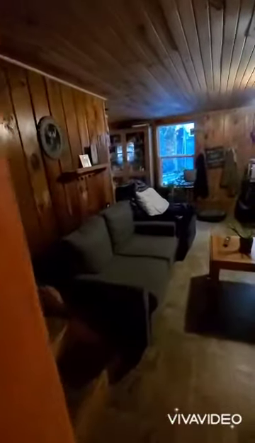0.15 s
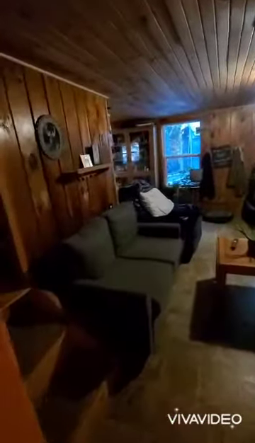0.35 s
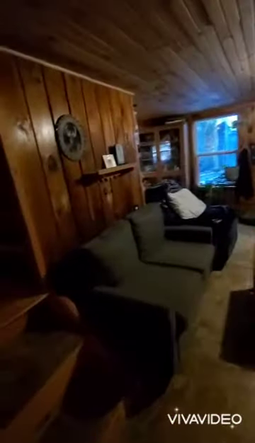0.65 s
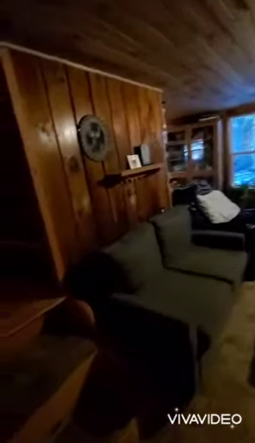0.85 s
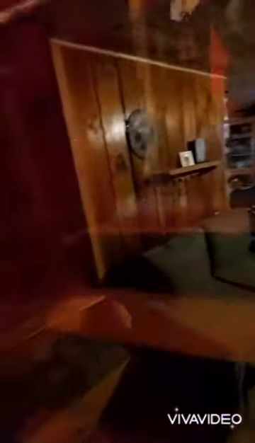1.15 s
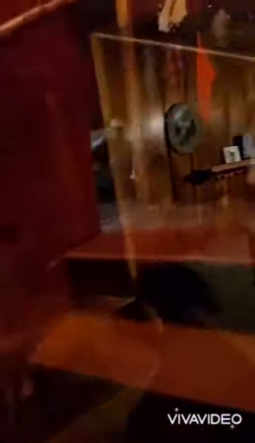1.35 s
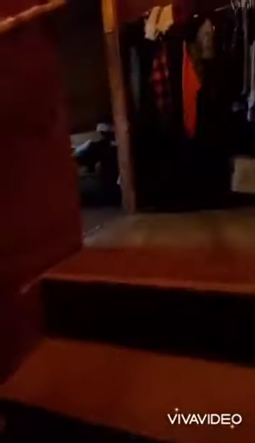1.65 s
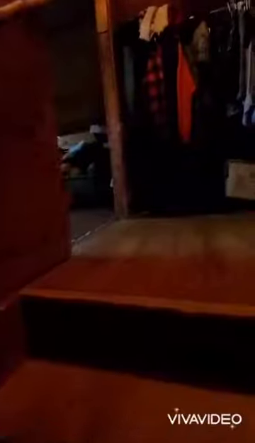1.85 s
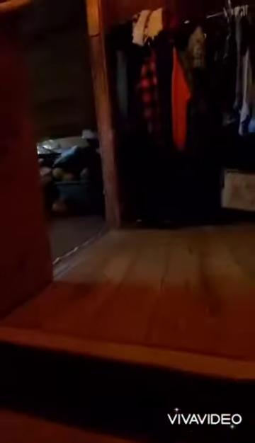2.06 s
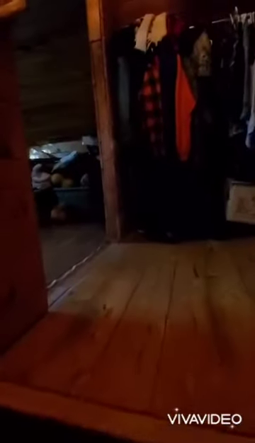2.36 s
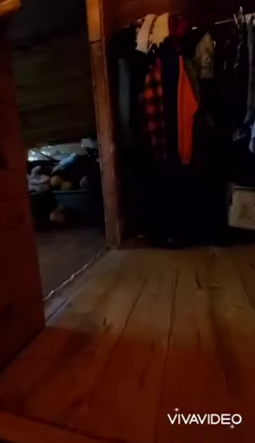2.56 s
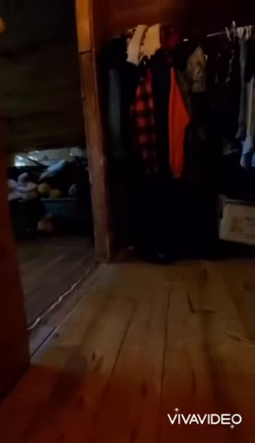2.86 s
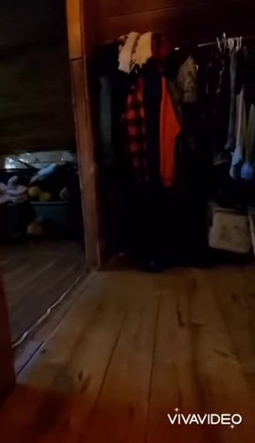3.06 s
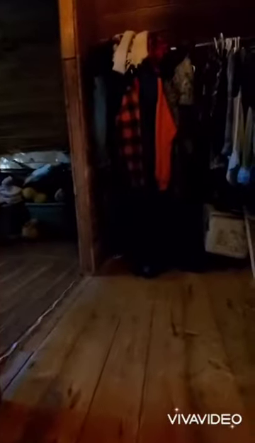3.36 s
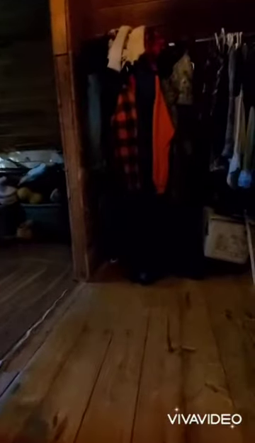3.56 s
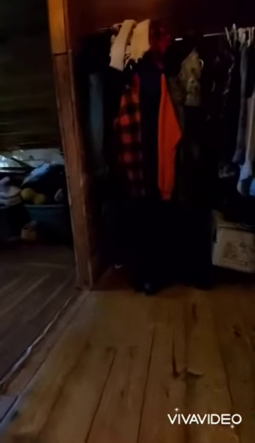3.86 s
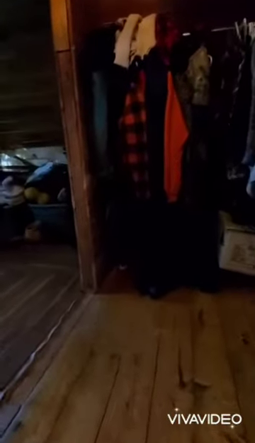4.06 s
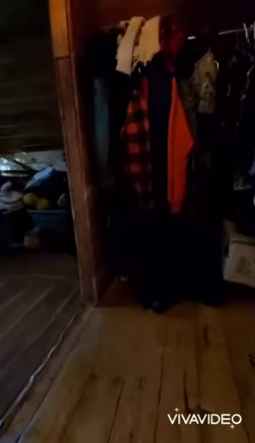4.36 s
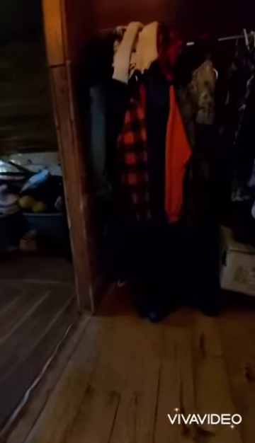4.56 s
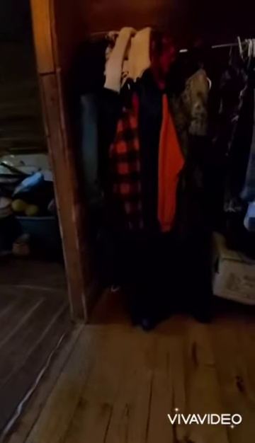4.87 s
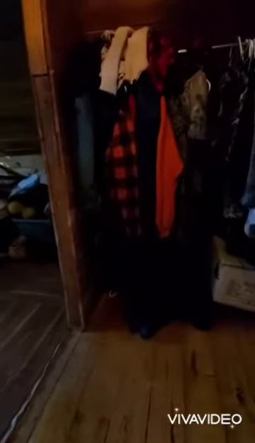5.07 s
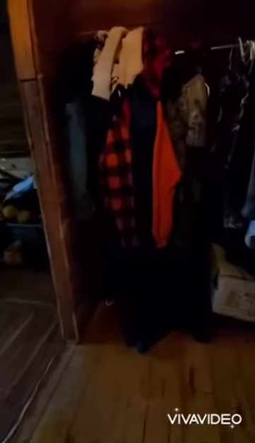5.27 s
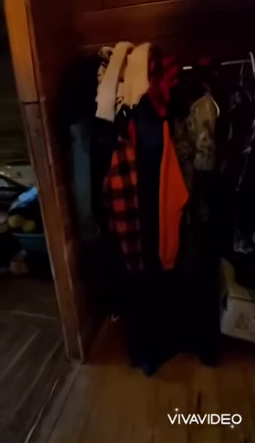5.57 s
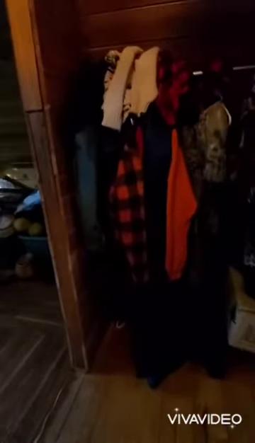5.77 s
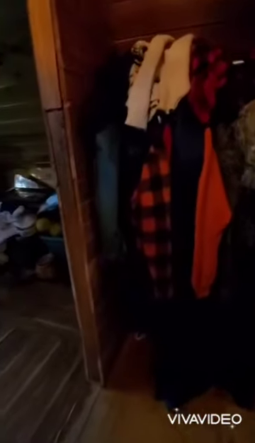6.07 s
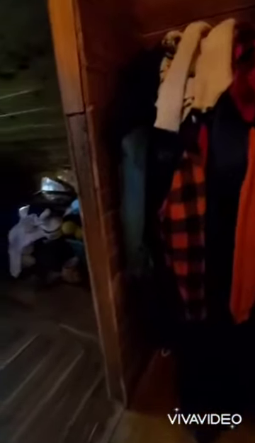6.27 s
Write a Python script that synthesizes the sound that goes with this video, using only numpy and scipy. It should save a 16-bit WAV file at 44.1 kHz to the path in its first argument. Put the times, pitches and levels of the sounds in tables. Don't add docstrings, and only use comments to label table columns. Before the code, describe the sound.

Shoes climb a few wooden stairs and cross a creaking plank landing indoors, uneven knocks and gritty scuffs, as a low fan hum fades behind.

```python
import sys
import numpy as np
from scipy import signal
from scipy.fft import rfft, irfft, next_fast_len
from scipy.io import wavfile
from scipy.ndimage import uniform_filter1d

SR = 44100
rng = np.random.default_rng(int(sys.argv[2]) if len(sys.argv) > 2 else 0)


def master_out(mix):
    frames = np.transpose(np.atleast_2d(mix))
    ceiling = np.clip(frames, -1, 1)
    pcm = np.round(ceiling * 32767).astype(np.int16)
    wavfile.write(sys.argv[1], SR, pcm)


def invert_db(level):
    return 10 ** (np.asarray(level, dtype=float) / 20)


N = 282681
FAST = next_fast_len(N, True)
TIME, HZ = np.arange(N) / SR, np.fft.rfftfreq(FAST, 1 / SR)
RING = TIME[:SR // 3]
THIRDS_HZ = 35 * 2 ** np.arange(0, 8.9, 1 / 3)

# (pitch_hz, side_minus_mid_db)
SIDE_DB = [(60, -18), (110, -20), (200, -10.5), (380, -3), (700, 5.5), (1290, 7), (2380, 0), (4400, 1),
           (8120, -1), (15000, 2)]
# (time_s, level_db)
FAN_LEVEL = [(0.0, -43.5), (0.29, -44.5), (0.82, -45.5), (1.23, -49), (1.36, -51.5), (1.69, -59),
             (2.0, -82)]
# (pitch_hz, level_db per Hz)
ECHO_COLOUR = [(24, -45), (40, -13.5), (194, 2), (276, -4.5), (312, 4.5), (516, 1), (615, 2), (733, -3.5),
               (2840, -21), (3830, -30.5), (5100, -28.5), (8130, -45.5), (9690, -39.5), (14500, -52),
               (16000, -51)]
# (start_s, length_s, knock_db, tap_db, tick_db), tap and tick relative to the knock
SLIDES = [
    (2.152, 0.059, -17.5, 4, -18.5),
    (2.8, 0.13, -22, 2, -24),
    (3.628, 0.2, -18, 0, -17),
    (3.96, 0.32, -68.5, 19, 8),
    (4.548, 0.0317, -26.5, 12.5, -6),
    (5.437, 0.16, -54, -4, -33),
    (5.63, 0.24, -49, -4, -15),
]


def read(table, hz):
    row_hz, value = np.transpose(table)
    return np.interp(np.log(hz + 1), np.log(row_hz + 1), value)


def mid_side(hz):
    return invert_db(np.array([[0], [read(SIDE_DB, hz)]]))


def band(x, lo_hz, hi_hz):
    sos = signal.butter(2, [lo_hz, min(hi_hz, .45 * SR)], "bandpass", fs=SR, output="sos")
    return signal.sosfilt(sos, x)


def walk(rate):
    hold = int(SR / rate)
    levels = np.repeat(rng.standard_normal(N // hold + 1), hold)
    return 1.4 * uniform_filter1d(uniform_filter1d(levels, hold), hold)[:N]


def air(gain, lo_hz, hi_hz):
    mid, side = rfft(rng.standard_normal((2, FAST))) * gain
    inside = (HZ > lo_hz) & (HZ < hi_hz)
    rms = np.sqrt(2 * np.sum(np.abs(mid[inside]) ** 2)) / FAST
    return irfft(np.array([mid, side * invert_db(read(SIDE_DB, HZ))]), FAST)[:, :N] / rms


def drone(lines):
    power = sum(invert_db(2 * db) / width / (1 + (2 * (HZ - hz) / width) ** 2) ** 2 for hz, width, db in lines)
    return air(np.sqrt(power), 0, SR) * np.sqrt(sum(invert_db(2 * db) for hz, width, db in lines))


def fan_level_db():
    return np.interp(TIME, *np.transpose(FAN_LEVEL), left=-150, right=-150)


def fan():
    # (pitch_hz, level_db per Hz)
    rush_colour = [(24, -50), (40, -14), (119, -2.5), (206, -12), (246, -8), (384, -6), (559, -4.5),
                   (730, -11.5), (1220, -10), (2530, -23), (3150, -20.5), (3600, -27), (6700, -37),
                   (7490, -43.5), (8000, -77), (10400, -107), (17600, -120)]
    # (pitch_hz, level_db)
    blade_tones = [(118.4, -55.5), (242.2, -55.5), (317.6, -58), (360.7, -87), (554.5, -51), (646.0, -57),
                   (1179, -58.5), (1394, -58), (2396, -65.5), (3047, -61), (3135, -61), (3245, -58.5),
                   (3456, -70)]
    rush = air(invert_db(read(rush_colour, HZ)), 180, 3000) * invert_db(0.1 * walk(9.7))
    lines = [(hz, 9 + hz / 90, db + 42.5) for hz, db in blade_tones]
    tones = invert_db(0.23 * walk(6.4)) * drone(lines)
    return invert_db(fan_level_db()) * (rush + tones)


def motor():
    # (pitch_hz, level_db)
    motor_tones = [(121, -53), (262, -60), (361, -65), (449, -52), (556, -61), (645, -59), (3133, -62)]
    swell_db, waver_rad = 5, 1.83
    out = np.zeros((2, N))
    for hz, db in motor_tones:
        level = invert_db(db + swell_db * np.tanh(walk(4.5)))
        sides = invert_db(np.array([[3], [read(SIDE_DB, hz)]]))
        phase = 2 * np.pi * (hz * TIME + rng.random((2, 1))) + waver_rad * walk(9.0)
        out += level * sides * np.sin(phase)
    return invert_db(fan_level_db() + 43.0) * out


def house():
    # (pitch_hz, level_db per Hz)
    air_colour = [(15, -36), (25, -12), (41, -14), (75, -2), (130, -20), (150, -16), (247, -17),
                  (285, -16.5), (354, -19.5), (438, -20.5), (835, -26.5), (1250, -39), (1480, -29),
                  (2120, -31), (7500, -40), (9750, -106), (16500, -120)]
    # (pitch_hz, width_hz, level_db)
    house_tones = [(56.7, 7.4, -1), (113.7, 8, -16), (3092, 95, -12.5), (3260, 72, -19), (2860, 250, -17.5),
                   (1234, 360, -7), (2020, 180, -47)]
    # (time_s, level_db)
    hum_level = [(0, -68), (1.33, -66.5), (2.1, -54.5), (3.2, -51.5), (4.29, -66), (4.62, -59), (6.18, -63),
                 (6.41, -58)]
    mains_hz, mains_db, air_db = 60.5, 2.5, -66.5
    core = np.sqrt(2) * invert_db(mains_db + 0.92 * walk(3.8)) * np.sin(2 * np.pi * mains_hz * TIME)
    core = core * np.array([[1], [.1]])
    hum = invert_db(np.interp(TIME, *np.transpose(hum_level))) * (core + invert_db(1.0) * drone(house_tones[:2]))
    whistle_db = air_db + 5.5 + 0.093 * (TIME - 3) + 1.4 * walk(4.4)
    whistle = invert_db(whistle_db) * drone(house_tones[2:])
    still_air = invert_db(air_db + .8 * walk(5.46)) * air(invert_db(read(air_colour, HZ)), 1100, 4200)
    swell = np.interp(TIME, [1.0, 2.0], [.3, 1])
    return swell * (still_air + whistle) + hum


def hiss():
    # (pitch_hz, level_db per Hz)
    hiss_colour = [(3820, -29), (6500, -11), (7820, -95), (8120, -18), (8590, 15), (9190, 16), (10100, 14),
                   (14800, 14.5), (15800, 23.5), (16000, 1)]
    level_db = -76 + np.interp(TIME, [0.9, 1.6], [0.5, 0])
    return invert_db(level_db) * air(invert_db(read(hiss_colour, HZ)) * (HZ > 6500), 7600, 15900)


def footfalls():
    # (start_s, knock_db, weight_db, brightness_db)
    heels = [(1.132, -54, -20, 14), (1.215, -41, 0, 11.5), (1.31, -35, -4, -5), (1.337, -25.5, -12, 5),
             (1.384, -58, 6, -6), (2.227, -23, -2, 8.5), (2.427, -50, 17.5, -11), (2.503, -49, 4, -23),
             (2.579, -61, 20, 10), (2.663, -23.5, -3.5, 9), (3.139, -19, -0.5, 4),
             (3.598, -26.5, -13, -6.5), (3.852, -20.5, -8.5, 2), (4.335, -20, -18.5, -0.5),
             (4.836, -68.5, -11, 28), (5.333, -37, -4, 8.5), (5.383, -36.5, -3, 0), (5.465, -34.5, -2, -6),
             (5.493, -30.5, -1, -9), (5.527, -51, 18, -1), (5.617, -53, 19, 0), (5.93, -57.5, 12, 10)]
    # (start_s, knock_db, weight_db, brightness_db)
    toes = [(1.875, -56, 11, -20), (2.152, -27, -4, 9.5), (2.757, -25.5, 2, -1), (2.947, -19.5, 0.5, 0.5),
            (4.093, -53, 25.5, -25), (4.239, -18.5, -15, 1.5), (5.15, -36.5, -4, -2.5),
            (6.175, -27, -27, 1), (6.329, -49.5, -7, -16)]
    # (start_s, knock_db, weight_db, brightness_db)
    soles = [(1.547, -53, -12, 4), (2.064, -28, 2, 1), (3.648, -33.5, -23, 2.5), (2.436, -42, -27, -10),
             (2.829, -26, -48, -9), (3.119, -47, -35, 9), (3.342, -37, 9, 8), (3.353, -16, -4, 1.5),
             (3.567, -25.5, -15, -4.5), (4.456, -46.5, 10.5, 8), (4.524, -37, -12, -6),
             (4.624, -35.5, 7, 1), (5.438, -35.5, 2, -4), (5.521, -27, -22, -14), (6.158, -33, -3, -12)]
    blows = []
    for rows, contact_s in ((heels, 0.0029), (toes, 0.0064), (soles, 0.012)):
        for start, knock_db, weight_db, bright_db in rows:
            tap_db = -3 + 0.78 * bright_db
            blows.append((start, knock_db, weight_db, tap_db, -16 + bright_db, contact_s))
    return blows


def slips():
    blows = []
    for board, (start, length, db, tap_db, tick_db) in enumerate(SLIDES):
        age, attack = np.arange(0, length, 1 / 130), 0.22 * length
        press_on = -10.5 * (1 - age / attack).clip(0)
        sag = -7 * (age - attack).clip(0)
        lift = -8.5 * (1 - (length - age) / 0.011).clip(0)
        chance = rng.standard_normal((40, 2))
        for a, press_db, (late, uneven) in zip(age, press_on + sag + lift, chance):
            knock_db = db - 8.5 + press_db + 2.4 * uneven
            blows.append((start + a + .0036 * late, knock_db, -8, tap_db, tick_db, .004, board))
    return blows


def stairwell():
    # (pitch_hz, time_s)
    echo_time = [(60, 0.16), (160, 0.27), (420, 0.19), (1100, 0.19), (2900, 0.17), (7700, 0.17),
                 (15000, 0.16)]
    edge = 2 ** (1 / 6)
    noise = np.array([band(rng.standard_normal((2, 2 * SR)), hz / edge, hz * edge) for hz in THIRDS_HZ])
    hz = THIRDS_HZ[:, None]
    t60 = read(echo_time, hz).clip(.03)
    build = 1 - np.exp(-RING / (0.0023 + 1.0 / hz))
    shape = invert_db(read(ECHO_COLOUR, hz)) / np.sqrt(t60) * build * invert_db(-60 * RING / t60)
    sides = invert_db(read(SIDE_DB, hz)[:, None] * np.array([[0], [1]]))
    return noise * sides, shape


def steps():
    # (low_hz, high_hz)
    blow_bands = np.array([(70, 280), (280, 1100), (1100, 3300), (3300, 14000)])
    # (pitch_hz, level_db, ring_time_s)
    board_modes = [(129.6, 0, 0.78), (213, -58, 0.075), (330, -18, 0.085), (400.6, -28, 0.053),
                   (561, 6.5, 0.32), (700, 11, 0.25), (1000, -14, 0.13), (1220, 3, 0.13), (1361, 4, 0.1),
                   (1682, 9, 0.062), (2040, -41, 0.1), (2630, -37, 0.15)]
    # (pitch_hz, level_db per Hz)
    scuff_colour = [(35, -39), (60, -2), (171, 0.5), (253, -1.5), (327, 0.5), (721, -2), (849, -7.5),
                    (1700, -17.5), (2250, -22), (2840, -19.5), (3750, -34), (4950, -25), (6600, -45.5),
                    (8090, -22.5), (9970, -50.5), (15500, -39)]
    noise, shape = stairwell()
    out = np.zeros((2, N + SR))
    peak = shape.max(axis=1) ** 2 * THIRDS_HZ * .23 * 2 / SR
    ref_db = [10 * np.log10(peak[(THIRDS_HZ > lo) & (THIRDS_HZ < hi)].sum()) for lo, hi in blow_bands]
    centres = np.sqrt(np.prod(blow_bands, axis=1))
    mode_hz, mode_db, mode_t60 = np.transpose(board_modes)[:, :, None]
    bins = np.fft.rfftfreq(16384, 1 / SR)
    member = 1. * (np.abs(np.log2(bins[1:] / THIRDS_HZ[:, None])) < 1 / 6)
    rasp_db = read(scuff_colour, THIRDS_HZ) - read(ECHO_COLOUR, THIRDS_HZ)
    blows = [(*row, len(SLIDES) + k) for k, row in enumerate(footfalls())]
    boards = len(SLIDES) + len(blows)
    places = rng.integers(SR // 4, SR, boards)
    detune = rng.standard_normal((boards, *mode_hz.shape))
    phases = rng.uniform(0, 2 * np.pi, (boards, 2, *mode_hz.shape))
    for start, knock_db, thump_db, tap_db, tick_db, contact_s, board in blows + slips():
        age = np.arange(0, 4, 1 / (np.clip(contact_s, .001, .03) * SR))
        grit_db = 3.49 * rng.exponential(1, len(age))
        push = rng.standard_normal(len(age)) * invert_db(grit_db) * np.exp(-age)
        force = np.sqrt(member @ np.abs(rfft(push, 16384)[1:]) ** 2 / member.sum(axis=1))
        levels = knock_db + np.array([thump_db, 0, tap_db, tick_db]) - ref_db
        sliding = board < len(SLIDES)
        gain = invert_db(read(list(zip(centres, levels)), THIRDS_HZ) + rasp_db * sliding) / force
        echo = noise[:, :, places[board]:places[board] + len(RING)]
        body = np.einsum("bt,bct->ct", gain[:, None] * shape, echo)
        hz = mode_hz * (1 + 0.0209 * detune[board])
        size = np.interp(hz, THIRDS_HZ, gain) * invert_db(mode_db - 31.5 - 60 * RING / mode_t60)
        size = size * (1 - np.exp(-RING * hz))
        for c in (0, 1):
            tone = np.sin(np.float32(2 * np.pi * hz * RING + phases[board, c]))
            body[c] += (size * invert_db(c * read(SIDE_DB, hz)) * tone).sum(axis=0)
        sound = signal.fftconvolve(body, push[None])
        i = int((start - .004) * SR)
        out[:, i:i + sound.shape[1]] += sound
    return invert_db(-9.5) * out[:, :N]


def cracks():
    # (start_s, level_db, centre_hz)
    snaps = [(1.135, -56, 6000), (1.2142, -47.5, 4100), (1.308, -53, 6470), (1.332, -42, 3500),
             (1.341, -34, 2000), (1.387, -50, 2200), (1.889, -71, 7000), (2.0626, -40, 2450),
             (2.152, -40, 3500), (2.2274, -34, 5000), (2.663, -34.5, 3500), (2.754, -50, 3470),
             (2.827, -49, 3957), (2.906, -43, 4000), (2.949, -36.5, 3530), (3.1386, -35, 2960),
             (3.3552, -32.5, 3500), (3.702, -38, 4000), (3.809, -41, 4000), (3.854, -40.5, 4130),
             (4.239, -36, 3100), (4.248, -39, 1520), (4.331, -38.5, 3030), (4.341, -42, 1500),
             (4.548, -48, 4440), (4.838, -58, 3000), (5.15, -61, 3000), (5.332, -50, 3500),
             (5.4414, -56, 3500), (6.173, -50, 2940), (4.097, -32.5, 170), (4.252, -22, 450),
             (4.345, -22.5, 450), (4.628, -30, 220), (5.468, -32, 300), (5.497, -27, 300),
             (5.535, -31, 320), (5.623, -35, 140), (5.352, -36.5, 280), (3.793, -23.5, 500),
             (2.238, -24, 400), (2.968, -25.5, 400)]
    snap_s, tail_db, tail_t60_s = 0.0013, -25, 0.21
    out = np.zeros((2, N + SR))
    decay = np.exp(-RING / snap_s)
    tail = invert_db(tail_db - 60 * RING / tail_t60_s) * (1 - decay)
    fade = np.e * RING / snap_s * decay + tail
    for start, db, hz in snaps:
        snap = band(rng.standard_normal((2, len(RING))), hz / 2.6, hz * 1.55)
        i = int((start - .001) * SR)
        out[:, i:i + len(RING)] += invert_db(db) * mid_side(hz) * fade * snap / snap.std()
    return out[:, :N]


def rubs():
    # (start_s, length_s, level_db, pitch_hz)
    sole_rubs = [(2.058, 0.06, -44, 790), (2.064, 0.083, -53, 1000), (2.059, 0.034, -45, 1840),
                 (2.155, 0.042, -33, 1000), (2.16, 0.033, -45, 1660), (2.15, 0.041, -48.5, 4520),
                 (2.223, 0.01, -56, 10500), (2.438, 0.033, -68, 1070), (2.66, 0.04, -41.5, 2550),
                 (2.661, 0.023, -44, 3000), (2.746, 0.018, -48, 2663), (2.789, 0.071, -44, 569),
                 (2.822, 0.17, -51, 1160), (2.817, 0.07, -42.5, 1530), (2.82, 0.14, -47, 1860),
                 (2.838, 0.1, -34.5, 330), (2.943, 0.015, -55, 2700), (3.139, 0.034, -46, 1520),
                 (3.132, 0.024, -39.5, 2520), (3.136, 0.013, -40, 2730), (3.363, 0.036, -44, 1670),
                 (3.341, 0.036, -40.5, 2670), (3.641, 0.086, -50.5, 4520), (3.651, 0.028, -45.5, 1820),
                 (3.678, 0.16, -48, 2800), (3.687, 0.09, -44.5, 2400), (3.688, 0.046, -48, 3580),
                 (3.692, 0.079, -49, 5220), (3.703, 0.075, -43, 895), (3.746, 0.069, -65, 4770),
                 (3.756, 0.07, -35.5, 1407), (3.849, 0.034, -36, 1377), (3.853, 0.021, -52, 2760),
                 (4.25, .03, -63, 5060), (4.543, 0.021, -43.5, 2730), (4.544, 0.017, -55, 4800),
                 (4.546, 0.019, -51, 5740), (4.562, 0.018, -57, 6700), (4.57, 0.033, -52, 4230),
                 (4.579, 0.06, -51, 1990), (4.593, 0.024, -49.5, 3100)]
    # (start_s, length_s, level_db, pitch_hz)
    further_rubs = [(1.211, 0.016, -52, 2000), (1.33, 0.015, -42, 1085), (1.333, 0.019, -43, 2070),
                    (1.316, 0.026, -32.5, 114), (1.345, 0.018, -31, 180), (2.062, 0.02, -60, 3850),
                    (2.065, 0.078, -44.5, 520), (2.171, 0.082, -30, 200.4), (2.426, 0.017, -61, 700),
                    (2.473, 0.18, -72, 1150), (2.675, 0.016, -30, 474), (3.14, 0.029, -27.5, 475),
                    (3.357, 0.063, -41, 577), (3.66, 0.15, -65, 5740), (3.716, 0.09, -73, 4200),
                    (4.235, 0.024, -36, 1020), (4.242, 0.021, -42, 2460), (4.336, 0.029, -53, 5200),
                    (4.549, 0.027, -36.5, 1930), (4.558, 0.031, -44, 2370), (4.598, 0.062, -59, 1430),
                    (5.145, 0.028, -63, 2640), (5.34, 0.02, -60, 3200), (5.464, 0.097, -59, 895),
                    (6.157, 0.018, -69, 1220), (6.162, 0.03, -52, 2880), (1.316, 0.014, -44, 710),
                    (2.066, 0.095, -50, 1190), (3.7, 0.12, -56.5, 9920)]
    # (start_s, length_s, level_db, pitch_hz)
    scrapes = [(2.153, 0.048, -48.5, 3600), (2.07, 0.039, -45.5, 320), (2.16, .1, -40.5, 345),
               (2.825, 0.1, -53.5, 4000), (2.80, .13, -42.5, 1050), (3.655, 0.178, -55, 5300),
               (3.855, 0.019, -55, 7200), (4.245, 0.037, -42, 1380), (2.665, 0.021, -36.5, 1030),
               (3.96, 0.196, -66, 2170), (1.5, 0.307, -62, 504)]
    out = np.zeros((2, N + SR))
    rows = [(*row, 11.6) for row in sole_rubs + further_rubs] + [(*row, 1.38) for row in scrapes]
    for start, length, db, hz, sharpness in rows:
        grain_db = 6.5 * rng.exponential(1, len(RING)).clip(0, 3)
        grit = rng.standard_normal((2, len(RING))) * invert_db(grain_db)
        spread = 1 + .5 / sharpness
        tone = band(grit, hz / spread, hz * spread)
        swell = (RING / (0.044 * length)).clip(0, 1)
        press = swell * invert_db(-60 * (RING - length).clip(0) / 0.12)
        i = int(start * SR)
        out[:, i:i + len(RING)] += tone / tone.std() * press * invert_db(db) * mid_side(hz)
    return out[:, :N] * invert_db(2.5 * walk(260))


def board_notes():
    # (start_s, level_db, pitch_hz)
    stringers = [(1.345, -25, 184.4), (1.874, -50, 75), (2.07, -21.5, 94), (2.426, -35, 125),
                 (2.671, -16, 202), (2.756, -35, 200), (2.947, -14, 212.4), (3.142, -27.5, 101.4),
                 (3.355, -32, 212), (3.775, -24, 163), (3.81, -20.5, 169.3), (4.094, -28.5, 141.7),
                 (4.1, -26, 216.4), (4.25, -22.5, 162), (4.342, -23.5, 169.6), (4.622, -33, 163.6),
                 (5.615, -44, 84)]
    # (start_s, level_db, pitch_hz)
    treads = [(1.341, -28, 344), (2.067, -35, 536), (2.164, -27, 370), (2.225, -17.5, 492),
              (2.673, -13, 515), (2.799, -18.5, 724), (2.849, -34, 690), (2.883, -26, 323),
              (2.95, -13, 523), (3.142, -17, 317.4), (3.355, -11.5, 508), (3.573, -47, 590),
              (3.852, -16.5, 575.6), (4.242, -15.5, 580), (4.336, -17.5, 482), (5.464, -23.5, 273),
              (5.49, -20.5, 291), (5.523, -26, 314), (6.159, -31, 448), (6.175, -21.5, 461)]
    # (start_s, level_db, pitch_hz)
    joints = [(1.2156, -29, 2010), (2.065, -18.5, 1393), (2.4348, -42, 1166), (2.663, -23, 1480),
              (2.669, -27, 1104), (2.944, -27, 2620), (3.1375, -38, 1540), (3.689, -21, 2800),
              (3.792, -21, 1297), (3.9694, -50, 1410), (4.0194, -48, 2182), (4.0594, -51, 2100),
              (4.139, -48, 780), (4.5525, -14.5, 1500), (4.563, -13.5, 2130), (4.5545, -29, 4760),
              (4.5644, -26, 4040), (4.576, -21.5, 3260), (5.155, -31, 1440), (5.332, -32, 1427),
              (5.442, -33.5, 2430), (5.4763, -35.5, 2420), (5.9298, -46, 2680), (6.1735, -29, 2400)]
    out = np.zeros((2, N + SR))
    for start, db, hz in stringers + treads + joints:
        t60 = np.clip(0.16 * (hz / 500) ** -0.43, .03, .5)
        pair = hz * (1 + 0.024 * np.array([[-1], [1]]))
        swell = 1 - np.exp(-RING / (0.0032 + 1 / hz))
        fade = swell * invert_db(db - 10.0 - 60 * RING / t60)
        phase = rng.uniform(0, 2 * np.pi, (2, 1, 1))
        tone = np.sin(2 * np.pi * pair * RING + phase).sum(axis=1)
        i = int((start - .003) * SR)
        out[:, i:i + len(RING)] += fade * tone * mid_side(hz)
    return out[:, :N]


def squeak():
    # (pitch_hz, width_hz, level_db)
    fabric_tone = (13300, 1800, -64)
    return drone([fabric_tone]) * np.exp(-((TIME - 6.238) / .015) ** 2)


def lean(sound, share, lag_s):
    mid, side = rfft(sound, FAST)
    direct = np.clip(share, -.9, .9) * np.sin(2 * np.pi * HZ * lag_s) * np.exp(-HZ / 5000)
    side = np.sqrt(1 - direct ** 2) * side - 1j * direct * invert_db(read(SIDE_DB, HZ)) * mid
    return irfft(np.array([mid, side]), FAST)[:, :N]


def scene():
    port_lag_s, fan_lag_s = .00042, -.00028
    below = lean(fan() + motor(), 0.47, fan_lag_s)
    upstairs = lean(house() + steps() + board_notes() + rubs(), 0.52, port_lag_s)
    snaps = lean(cracks(), 0.5, port_lag_s)
    mid, side = below + upstairs + snaps + squeak() + hiss()
    return np.array([mid + side, mid - side])


def top_cut(x):
    return signal.sosfilt(signal.butter(12, 16470, fs=SR, output="sos"), x)


def record(dry):
    # (pitch_hz, left_minus_right_db)
    left_tilt = [(60, -2.5), (110, 0), (200, 0), (380, -0.5), (700, 1.5), (1290, -0.5), (2380, 4),
                 (4400, 5.5), (8120, 7), (12000, 9)]
    # (pitch_hz, width_hz, left_depth 0-1, right_depth 0-1)
    port_dip = (7980, 780, 0.54, 0.43)
    tilt = invert_db(read(left_tilt, HZ))
    share = np.sqrt(2 / (1 + tilt ** 2)) * np.array([tilt, np.ones_like(tilt)])
    hz, width, *depth = port_dip
    dip = 1 - np.clip(depth, 0, 1)[:, None] * np.exp(-((HZ - hz) / width) ** 2)
    top = 1 / (1 + (HZ / 15600) ** 300)
    mix = irfft(rfft(dry, FAST) * share * dip * top, FAST)[:, :N]
    return top_cut(mix)


dry = scene()
out = record(dry)
master_out(out)
```